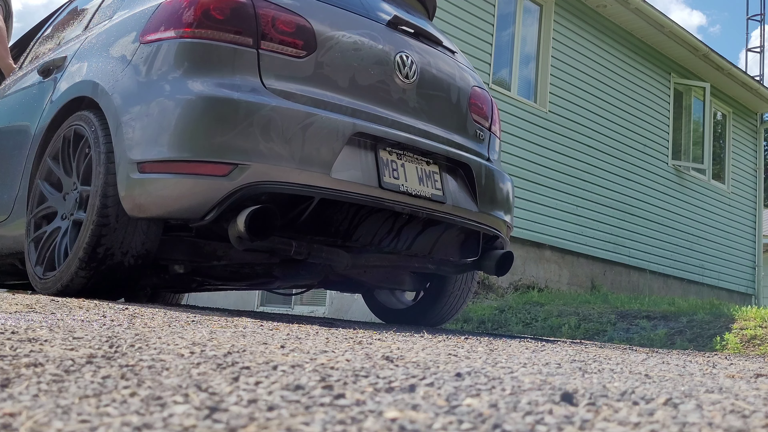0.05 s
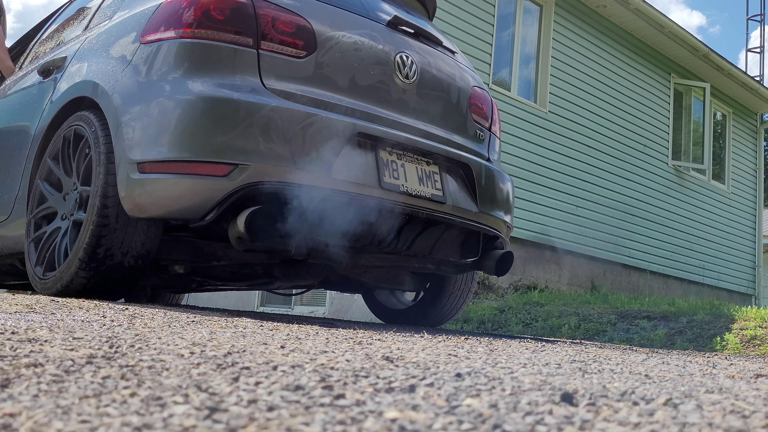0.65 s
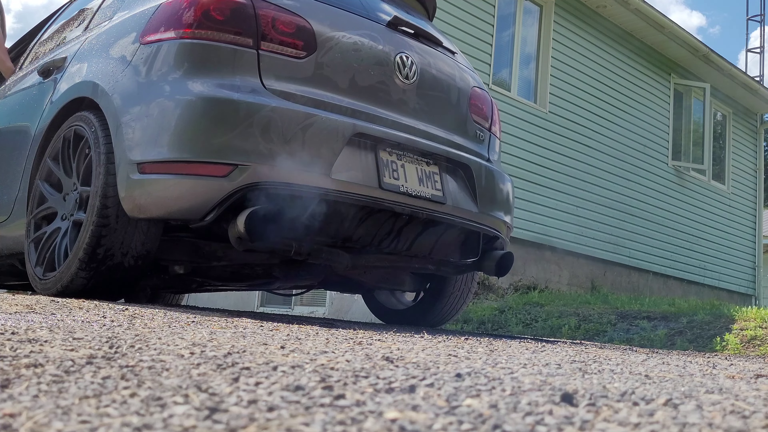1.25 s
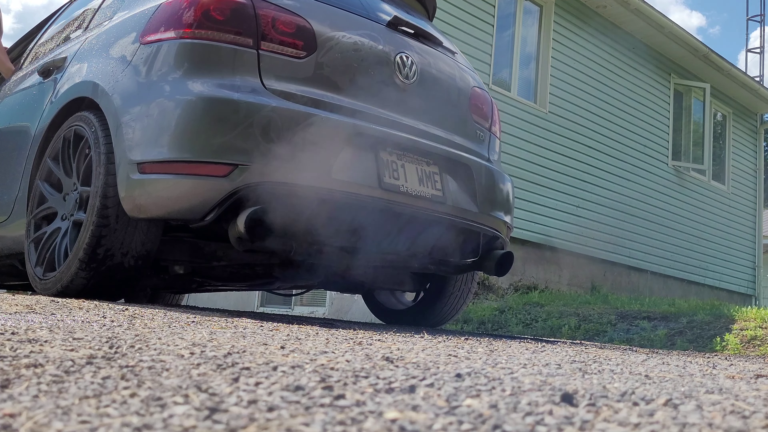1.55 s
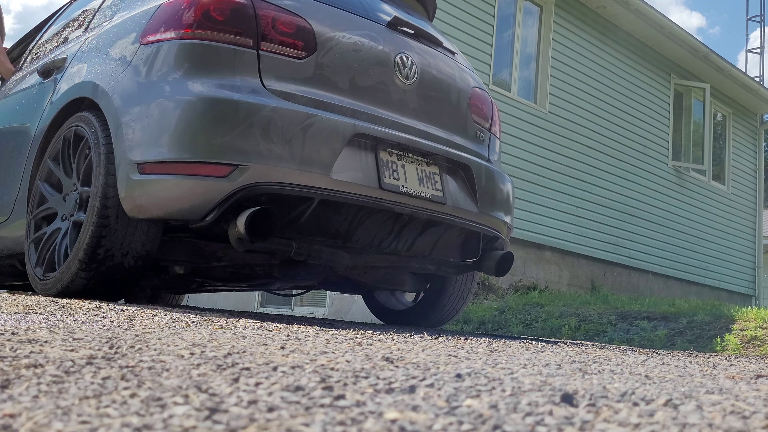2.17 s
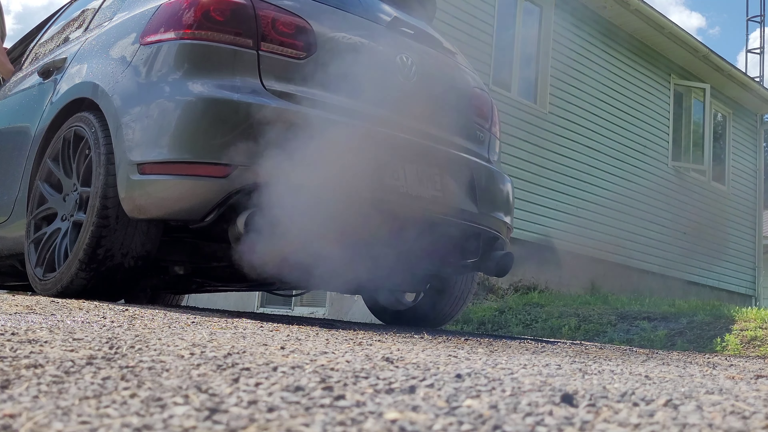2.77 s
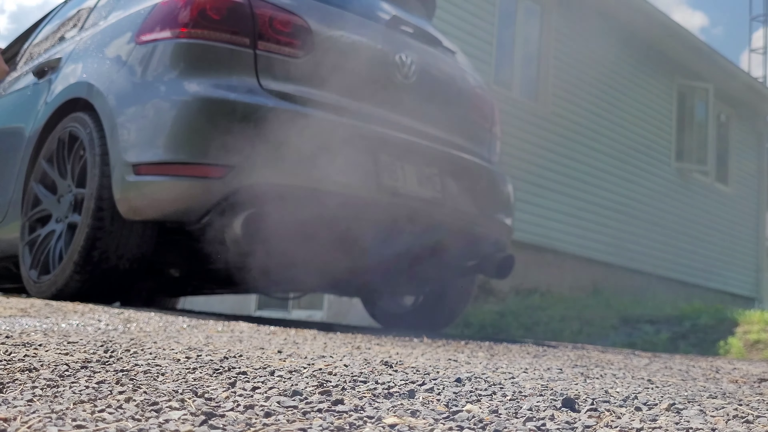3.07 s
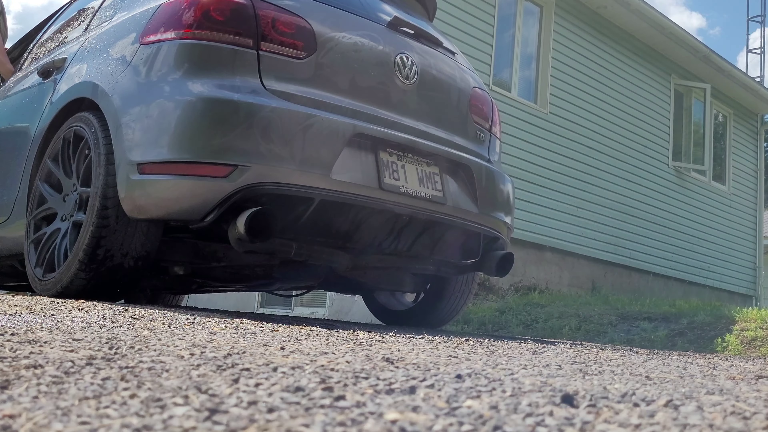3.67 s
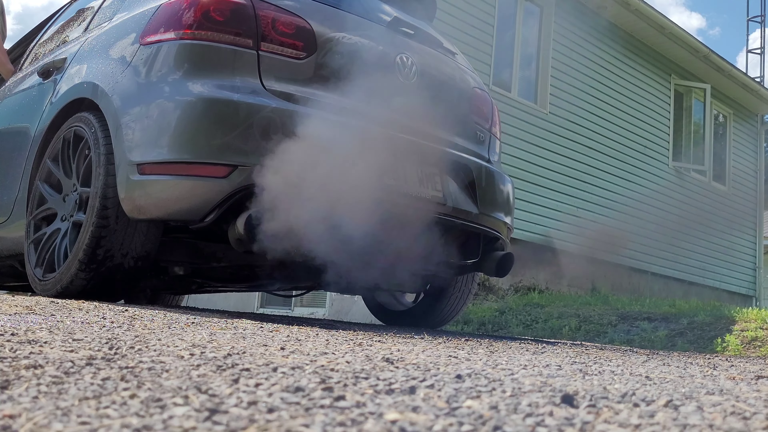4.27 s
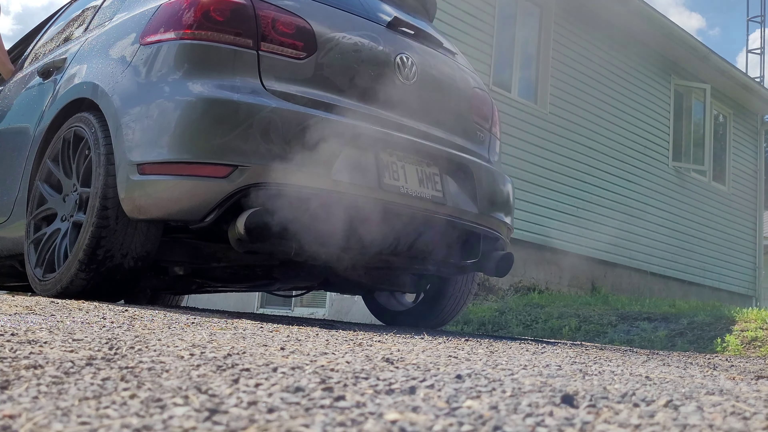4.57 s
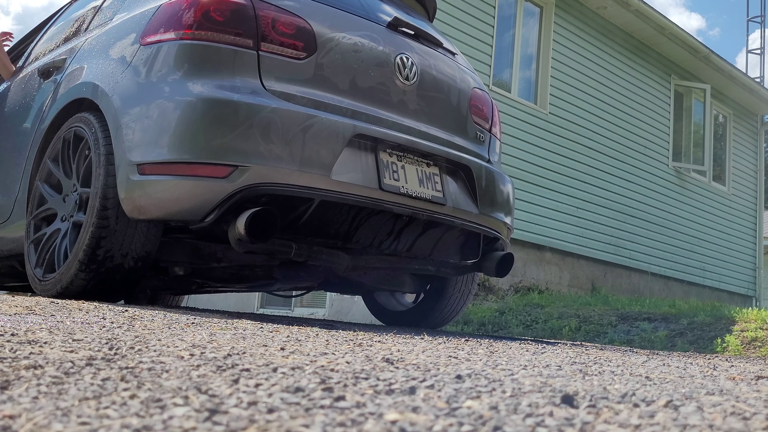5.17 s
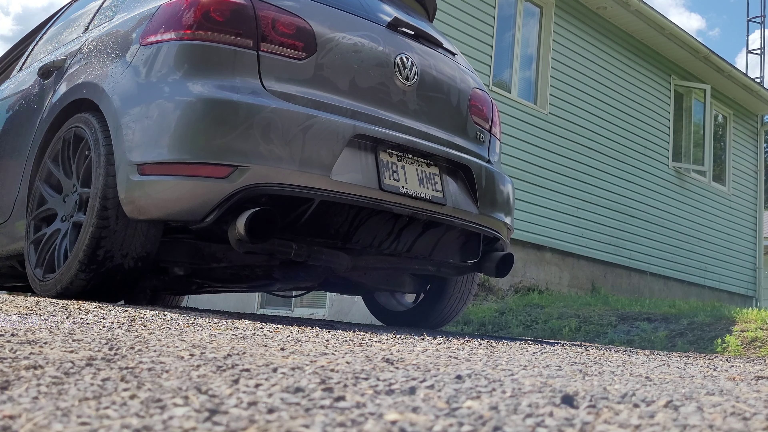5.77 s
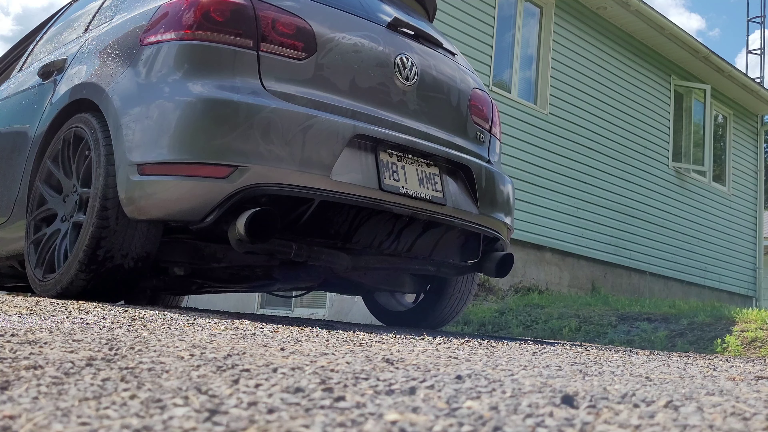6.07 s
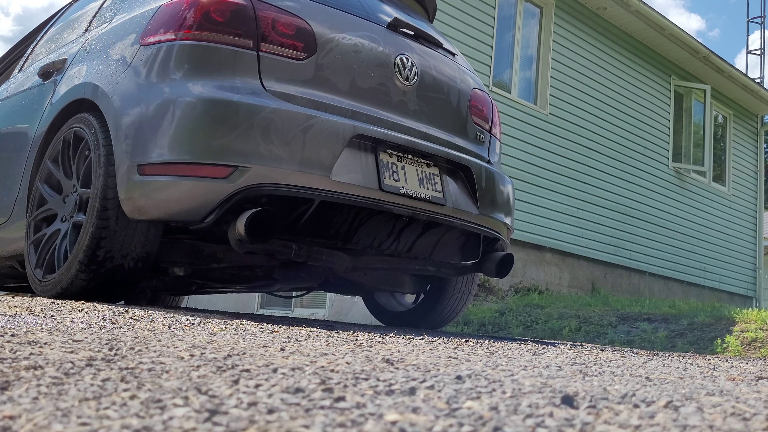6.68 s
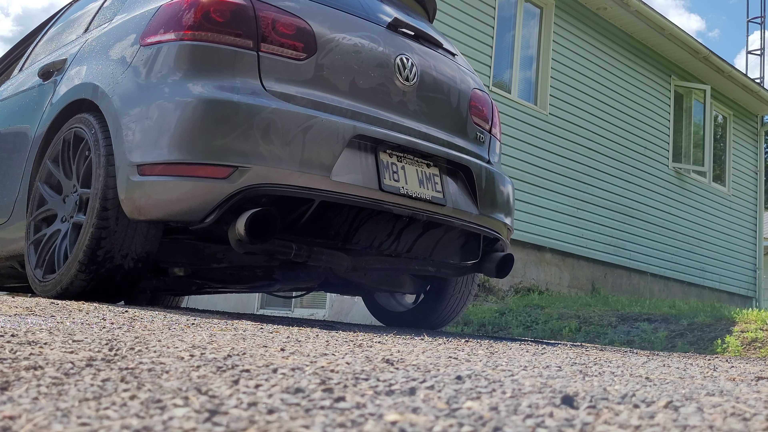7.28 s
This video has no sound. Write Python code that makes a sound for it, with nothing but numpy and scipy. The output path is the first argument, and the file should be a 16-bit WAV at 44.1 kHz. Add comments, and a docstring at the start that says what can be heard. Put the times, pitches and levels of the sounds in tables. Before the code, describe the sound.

Four loud, barking revs from a stationary turbo diesel car, followed by a long fall to a clattering idle.

```python
"""Revving a turbo diesel

A four-cylinder diesel with an open exhaust stands on gravel, is revved four times and sinks to idle.
Each firing sends a pulse down the long tailpipe, which booms, barks and rasps: ragged under fuel,
cleaner when coasting at high revs. The engine clatters further off, the turbo whistles up and back
down, spare air sighs out, and a house wall answers. Engine speed is counted in firings per second."""
import sys
import numpy as np
from scipy import signal
from scipy.fft import rfft, irfft, next_fast_len
from scipy.io import wavfile
from scipy.ndimage import uniform_filter1d, map_coordinates

SR = 44100
rng = np.random.default_rng(int(sys.argv[2]) if len(sys.argv) > 2 else 0)


def generate_wav(signal):
    """Clip the signal to [-1, 1] and save it as 16-bit WAV at the path in sys.argv[1]."""
    frames = np.transpose(np.atleast_2d(signal))
    scaled = np.clip(frames, -1, 1) * 32767
    pcm = np.round(scaled).astype(np.int16)
    wavfile.write(sys.argv[1], SR, pcm)


N = 327663

# How fast the engine runs. Each row: time in seconds, firings per second.
ENGINE_SPEED = [(0,31),(.087,34.6),(.14,44),(.46,85.5),(1.03,59),(1.52,133),(2.1,97.5),(2.35,84),(2.68,142),(2.82,169),(3.2,143.5),(3.42,126),(3.7,110.5),(3.9,105),(4.1,134),(4.31,170),(4.6,157),(5.2,116.5),(6,72.5),(6.8,36),(7.2,28.5)]
# Pedal presses. Each row: press and lift in seconds, then fuel (0-1) at first, at the lift and after.
PEDAL_PRESSES = [(0.027, 0.445, 1.0, 0.83, .44), (1.037, 1.486, 0.85, 0.68, .39),
                 (2.355, 2.804, .75, 0.77, 0.01), (3.905, 4.273, 0.47, 0.83, 0.05)]
# How uneven the cylinders can get. Each entry: one cylinder's pulse in dB, in firing order.
CYLINDER_DB = [0, -11, -1.5, -8]

# The tailpipe without fuel and at full fuel. Each row: firings per second, bark in dB, rasp in dB.
PIPE_COASTING = [(28, -38, -46.5), (33.6, -34.5, -44.5), (57.7, -35.5, -44), (82.7, -36, -48.5),
                 (88.7, -25.5, -49), (91, -34, -46), (106.1, -19.5, -39), (115, -29, -39.5),
                 (134.8, -20, -35), (137.1, -15, -19), (145, -16.5, -22.5), (161, -14, -25)]
PIPE_FUELLED = [(33, -20.5, -37), (45.8, -13.5, -33), (75.5, -9, -27), (110, -5, -16), (136, -9.5, -15),
                (162, -14.5, -18)]
# Swirling gas in the exhaust. Each row: firings per second, share (0-1) coasting, share at full fuel.
ROUGHNESS = [(35, .85, .35), (72, .8, .55), (90, .35, .4), (107, .14, .32), (120, .32, .26),
             (140, .07, .25), (165, .07, .2)]
# The pipe's low drone. Each row: firings per second, gain in dB coasting, gain in dB at full fuel.
DRONE_GAINS = [(28.5, -44, -27), (32.5, -36, -22), (44.5, -33.5, -21.5), (59.5, -26, -16.5),
               (76, -32.5, -13.5), (120, -32.5, -29.5), (165, -31.5, -27)]
# The notes the cool pipe rings at. Each row: pitch in Hz, width in Hz, level in dB.
PIPE_RESONANCES = [(63.3, 9.5, -20), (106.1, 13.2, -20), (119, 62, -31.5), (144.1, 15.5, -15.5),
                   (181, 18.4, -23.5), (223.5, 34, -22.5), (264.8, 25, -10.5), (325.4, 35, -9)]
# The engine without fuel and at full fuel. Each row: firings per second, clatter, ticks and hiss in dB.
BLOCK_COASTING = [(28, -37.5, -46, -67), (35, -37, -48.5, -66.5), (60, -39.5, -50, -59),
                  (75, -45, -56, -66), (117, -41, -57.5, -67), (166, -33.5, -49.5, -60.5)]
BLOCK_FUELLED = [(34, -26, -47.5, -49), (60.5, -23, -37, -38.5), (77, -20.5, -33.5, -37.5),
                 (116, -24, -44, -48), (165, -34, -58, -56)]
# The turbo's whistle. Each row: time in seconds, pitch in Hz, level in dB.
TURBO_WHISTLE = [(0, 7300, -51), (.06, 7460, -36.5), (.15, 8200, -36), (.29, 11000, -37.5),
                 (.44, 15400, -45), (.52, 16900, -48), (1, 16400, -46), (1.07, 15800, -37),
                 (1.2, 18000, -82), (6, 17300, -80), (6.3, 16500, -62), (6.8, 13900, -58),
                 (7, 12500, -52.5), (7.43, 10600, -70)]
# Spare boost escaping after a lift. Each row: start in seconds, level in dB, seconds to fade by 20 dB.
AIR_RELEASES = [(1.55, -45.5, 0.5), (2.87, -60.5, .5), (4.35, -53, 1.6)]

# The tone colour of each sound. Each row: frequency in Hz, relative level in dB.
BARK_COLOUR = [(90, -60), (190, -16), (250, 0), (320, 6.5), (390, -1), (460, -0.5), (550, -4.5), (640, 0.5),
               (720, -18.5), (900, -30.5), (2000, -78.5)]
ROAR_COLOUR = [(250, -20.5), (350, -25), (420, -9), (500, -15), (600, -26.5), (800, -41.5)]  # the pipe under fuel
CHUG_COLOUR = [(150, -5), (260, 0.5), (340, -7), (450, -24), (700, -42)]  # the same at low revs
RASP_COLOUR = [(400, -43.5), (720, -7.5), (840, 10.5), (950, 2), (1250, -1), (1600, -7.5), (1900, -6.5),
               (2200, -16), (3200, -12.5), (4400, -23.5), (5300, -31), (9000, -72), (16000, -71)]
FRONT_COLOUR = [(2800, -5), (3700, -9), (4600, -6), (7000, -33)]  # limits how sharp a wave front can be
JET_COLOUR = [(1000, -39.5), (2500, -0.5), (3900, 4), (4600, -0.5), (5200, -6.5), (8000, -16), (12000, -56)]
DRONE_COLOUR = [(40, -22), (70, -6), (110, -2), (150, 0), (190, -9), (260, -8), (340, -26.5), (600, -81.5)]
CLATTER_COLOUR = [(150, -29.5), (450, -3), (720, 4), (850, 1), (1400, 6), (1850, 7), (2300, 2), (2750, 3.5),
                  (3350, 2), (3800, -9), (5000, -12.5), (8000, -30.5)]
TICK_COLOUR = [(3500, -30), (4600, -15), (5200, 6.5), (5700, 9), (6700, -0.5), (7200, 3.5), (7650, 8),
               (8300, 4.5), (9200, -7), (14000, -23)]
HISS_COLOUR = [(2000, -16), (5000, -30), (9000, 5), (12000, 4), (16000, 0.5)]

# How alike noise is in the two ears. Each row: frequency in Hz, likeness from -1 (opposite) to 1 (same).
EAR_LIKENESS = [(200, 0.54), (900, 0.59), (1800, 0.49), (3500, 0.0075), (5500, -0.75), (7700, -0.16),
                (12000, 0.15)]
# The yard's echo. Each row: frequency in Hz, seconds to fade by 60 dB.
ECHO_FADE = [(150, 0.26), (1500, 0.95), (8000, 0.033)]


def tailpipe(phase, speed, fuel):
    """Pulses and puffs of gas make a hollow bark, and a rasp where the wave fronts steepen."""
    bark_db, rasp_db = by_fuel(at_speed(PIPE_COASTING, speed), at_speed(PIPE_FUELLED, speed), fuel)
    rough = by_fuel(*at_speed(ROUGHNESS, speed), fuel)
    slow = np.clip(1 - speed / 90, 0, 1)
    # slow firings under fuel stand apart as knocks; without fuel the flow evens out
    rest = .3 - .26 * np.clip(3 * slow * fuel ** 2, 0, 1) + 1.2 * slow * (1 - fuel)
    flow = puffs(phase, decay=4, rest=rest) * np.sqrt(cylinder_strength(phase, speed, fuel))
    gas = lambda colour: coloured(rng.standard_normal(N) * flow, colour)
    pulses = firings(phase, speed, fuel, scatter_db=1.5)
    bark = blend(shaped(pulses, BARK_COLOUR, turn=.9), gas(BARK_COLOUR), rough)
    # hot, fast gas roars higher than slow firings do
    roar = (1 - slow) * shaped(bark, ROAR_COLOUR)
    chug = 2 * slow * shaped(bark, CHUG_COLOUR)
    bark = bounce(pipe(bark + fuel * (roar + chug), reflection=.29), share=.5)
    # only strong waves steepen into cracks; weak ones leave a soft wash
    cracks = shaped(shaped(pulses, RASP_COLOUR, turn=.3), FRONT_COLOUR)
    wash = np.clip((-24 - rasp_db) / 20, 0, .7)
    rasp = blend(cracks, gas(RASP_COLOUR), np.sqrt(rough) * (.4 + 1.3 * fuel + slow) + wash)
    rasp = bounce(pipe(rasp, reflection=.34), share=.41)
    bark = surging(bark_db) * steady(without_octave(bark, phase))
    rasp = surging(rasp_db) * steady(rasp)
    return placed(bark, left_db=.6, lead_ms=-.066) + placed(rasp, left_db=0, lead_ms=.08)


def boom(phase, speed, fuel):
    """The firing note and its octave swell as they cross the pipe's resonances, over a low drone."""
    cool_hz = speed / warmth(speed, fuel)
    note_gain = pipe_gain(cool_hz) * amp(5.5 * fuel)
    octave_gain = pipe_gain(2 * cool_hz) * amp(-10.5 + 14.5 * fuel)
    angle = 2 * np.pi * phase
    tones = note_gain * np.cos(angle + 1.3) + octave_gain * np.cos(2 * angle + 3.17)
    overtones = sum(np.cos(k * angle) for k in range(3, 9)) * amp(1.5 * wobble(25))
    flutter = amp(18) * rng.standard_normal(N)
    drone = pipe(coloured(overtones + flutter, DRONE_COLOUR), reflection=.52)
    drone_db = by_fuel(*at_speed(DRONE_GAINS, speed), fuel)
    return np.sqrt(2) * tones + amp(drone_db) * drone


def gas_jet(phase, speed, fuel):
    """At full flow the gas leaving the pipe adds a bright rush."""
    gain = amp(-30 + 79 * np.log10(speed / 160)) * fuel
    return gain * wide_noise(JET_COLOUR) * puffs(phase, decay=1.3, rest=1)


def accelerator(press_s=.029, lift_s=.038):
    """Fuel comes on quickly at each press, is held, and drops at the lift."""
    points, left_on = [], 0
    for press, lift, first, last, after in PEDAL_PRESSES:
        points += [(press, left_on), (press + press_s, first), (lift, last), (lift + lift_s, after)]
        left_on = after
    return np.clip(curves(points)[0], 0, 1)


def firings(phase, speed, fuel, scatter_db):
    """One pulse per firing; burning fuel makes their timing ragged."""
    at = np.flatnonzero(np.diff(phase.astype(int))) + 1
    chance = rng.standard_normal((len(at), 2))
    size = cylinder_strength(phase, speed, fuel)[at] * amp(scatter_db * chance[:, 0])
    late_s = (.00004 + .00007 * fuel[at]) * chance[:, 1]
    return np.bincount(np.clip(at + late_s * SR, 0, N - 1).astype(int), size, N)


def cylinder_strength(phase, speed, fuel):
    """The cylinders pulse alike at idle; at high revs every second one leads, most when coasting."""
    uneven = np.clip((speed - 55) / 85, 0, 1) * (1 - .5 * fuel)
    return amp(uneven * np.take(CYLINDER_DB, phase.astype(int) % len(CYLINDER_DB)))


def pipe(x, reflection, lowest_hz=20.9):
    """The open end sends waves back upside down, so the pipe rings at 1, 3, 5.. times its lowest note."""
    return filtered(x, lambda hz: 1 / (1 + reflection * np.exp(-1j * np.pi * hz / lowest_hz)))


def pipe_gain(hz):
    """How strongly the pipe passes a note: its resonances added by power."""
    return np.sqrt(sum(amp(db) ** 2 * .5 ** ((2 * (hz - centre) / width) ** 2)
                       for centre, width, db in PIPE_RESONANCES))


def warmth(speed, fuel, cool_speed=24, lag_s=.054):
    """How many times higher hot gas makes the pipe ring; the heat lags behind the fuel."""
    heat = .36 * fuel ** 3 * (speed - cool_speed) / (100 - cool_speed)
    keep = np.exp(-1 / (lag_s * SR))
    return 1 + signal.lfilter([1 - keep], [1, -keep], heat)


def without_octave(x, phase):
    """Take out the octave of the firing note, which belongs to the boom."""
    octave = np.exp(4j * np.pi * phase)
    swell = uniform_filter1d(uniform_filter1d(x / octave, size=SR // 20), size=SR // 20)
    return x - 2 * np.real(swell * octave)


def engine(phase, speed, fuel):
    """Burning fuel clatters and injectors tick under the car, while escaping gas hisses."""
    coasting, fuelled = at_speed(BLOCK_COASTING, speed), at_speed(BLOCK_FUELLED, speed)
    clatter_db, tick_db, hiss_db = by_fuel(coasting, fuelled, fuel)
    # fuel at low revs knocks hardest
    strain = np.clip(2.5 * fuel - 1, 0, 1) * np.clip((85 - speed) / 35, 0, 1)
    knock = puffs(phase, decay=3.5 + .6 * strain, rest=1.1 - .98 * strain)
    clatter = amp(clatter_db) * unit(bounce(wide_noise(CLATTER_COLOUR) * knock, share=.3))
    ticks = amp(tick_db) * wide_noise(TICK_COLOUR) * puffs(phase, decay=.8, rest=.95)
    hiss = surging(hiss_db) * wide_noise(HISS_COLOUR) * puffs(phase, decay=2, rest=1.2)
    return clatter + ticks * amp([[1.2], [-1.2]]) + hiss * amp([[3], [-8]])


def turbo(phase, fuel):
    """The spinning blades make a fuzzy whistle that spreads into an airy whoosh under fuel."""
    pitch_hz, level_db = curves(TURBO_WHISTLE)
    blades = np.exp(2j * np.pi * np.cumsum(pitch_hz) / SR)
    band = lambda rate: unit(np.real(blades * (wobble(rate) + 1j * wobble(rate))))
    spread = fuel * np.clip((pitch_hz - 6500) / 3000, .15, 1)
    whistle = blend(band(rate=330), band(rate=1900), .25 + .7 * spread)
    return amp(level_db) * whistle * puffs(phase, decay=2.7, rest=.3) * amp([[4], [-9]])


def venting(rise_s=.04):
    """Spare air from the turbo escapes in soft sighs that swell quickly and fade."""
    flow = 0
    for start, db, fade_s in AIR_RELEASES:
        age = np.maximum(np.arange(N) / SR - start, 0)
        flow += amp(db - 20 * age / fade_s) * np.minimum(age / rise_s, 1)
    return flow * wide_noise(HISS_COLOUR) * amp([[3], [-8]])


def bounce(x, share, spacing_hz=459):
    """A second path off the ground or underbody, about 2 ms longer, leaves evenly spaced peaks."""
    return filtered(x, lambda hz: 1 + share * np.exp(-2j * np.pi * hz / spacing_hz))


def yard_echo(x):
    """A short scattered answer from the wall, the gravel and the car's underside."""
    hz, t, noise = signal.stft(rng.standard_normal((2, SR // 3)), SR, nperseg=256)
    fade = amp(-60 * t / at_hz(ECHO_FADE, hz)[:, None])
    tail = signal.istft(noise * fade, SR, nperseg=256)[1]
    return signal.fftconvolve(x, tail / np.linalg.norm(tail[0]), axes=1)[:, :N]


def puffs(phase, decay, rest):
    """A loudness curve that jumps at each firing, then sinks toward a resting level."""
    return steady(np.abs(rest) + np.exp(-decay * (phase % 1)))


def surging(level_db, depth_db=2):
    """The gain of a gas flow that surges a little by chance."""
    return amp(level_db + depth_db * wobble(rate=24))


def wobble(rate):
    """A smooth curve through rate random points a second."""
    points = rng.standard_normal(int(N * rate / SR) + 4)
    return map_coordinates(points, [np.arange(N) * rate / SR])


def blend(clean, noisy, rough):
    """Mix two sounds; rough is the noisy one's share of the power."""
    share = np.clip(rough, 0, 1)
    return steady(np.sqrt(1 - share) * steady(clean) + np.sqrt(share) * steady(noisy))


def wide_noise(colour):
    """Stereo noise, less alike between the ears in the treble than in the bass."""
    def response(hz):
        angle = np.arccos(np.clip(at_hz(EAR_LIKENESS, hz), -1, 1)) / 2
        return amp(at_hz(colour, hz)) * np.array([np.cos(angle), np.sin(angle)])
    mid, side = filtered(rng.standard_normal((2, N)), response)
    return unit(np.array([mid + side, mid - side]))


def placed(x, left_db, lead_ms):
    """Make a sound louder and earlier on the left; negative values favour the right."""
    side = np.array([[.5], [-.5]])
    return amp(side * left_db) * filtered(x, lambda hz: np.exp(2j * np.pi * hz * side * lead_ms / 1000))


def shaped(x, colour, turn=0):
    """Colour a sound so each pulse is a brief wave; turn (radians) deepens the dip after its crest."""
    return filtered(x, lambda hz: amp(at_hz(colour, hz)) * np.exp(1j * turn))


def coloured(x, colour):
    """Colour a sound so that it rings only after each strike."""
    def response(hz):
        cepstrum = irfft(np.log(amp(at_hz(colour, hz))))
        cepstrum[1:len(hz) - 1] *= 2  # move the early ringing to after the strike
        cepstrum[len(hz):] = 0
        return np.exp(rfft(cepstrum))
    return filtered(x, response)


def filtered(x, response):
    """Scale and delay each frequency as response(hz) says."""
    size = 2 * next_fast_len(N // 2 + SR // 4)
    return irfft(rfft(x, size) * response(np.fft.rfftfreq(size, 1 / SR)), size)[..., :N]


def curves(rows):
    """One value per sample for each column after the time."""
    times, *columns = np.transpose(rows)
    return [np.interp(np.arange(N) / SR, times, c) for c in columns]


def at_speed(rows, speed):
    """Read each column of a table at the engine's speed."""
    speeds, *columns = np.transpose(rows)
    return np.array([np.interp(speed, speeds, c) for c in columns])


def at_hz(rows, hz):
    """Read a table at these frequencies, on a scale of octaves."""
    frequencies, values = np.transpose(rows)
    return np.interp(np.log(hz + 1), np.log(frequencies + 1), values)


def by_fuel(coasting, fuelled, fuel):
    """Slide from the coasting value to the full-fuel value."""
    return coasting + fuel * (fuelled - coasting)


def steady(x):
    """Hold the average level (rms) near 1 over every tenth of a second."""
    power = uniform_filter1d(uniform_filter1d(x ** 2, size=SR // 14), size=SR // 20)
    return x / np.sqrt(np.abs(power) + 1e-12)


def unit(x):
    """Scale the whole sound to an average level (rms) of 1."""
    return x / np.sqrt(np.mean(x ** 2) + 1e-20)


def amp(db):
    """Turn decibels into a gain."""
    return 10 ** (np.asarray(db) / 20)


def scene():
    """Speed and fuel drive the exhaust and engine; the turbo, sighs and echo join them."""
    speed, = curves(ENGINE_SPEED)
    fuel = accelerator()
    phase = .56 + np.cumsum(speed) / SR  # goes up by one at each firing
    exhaust = tailpipe(phase, speed, fuel) + gas_jet(phase, speed, fuel)
    low = placed(boom(phase, speed, fuel), left_db=-.5, lead_ms=-.32)
    echo = amp(-22) * yard_echo(exhaust)
    return low + exhaust + echo + engine(phase, speed, fuel) + turbo(phase, fuel) + venting()


def record(dry, top_hz=15850):
    """Round off the loudest peaks and cut the very highest treble."""
    rounded = dry / (1 + np.abs(dry) ** 6) ** (1 / 6)
    return filtered(rounded, lambda hz: hz < top_hz)


dry = scene()
out = record(dry)
generate_wav(out)
```